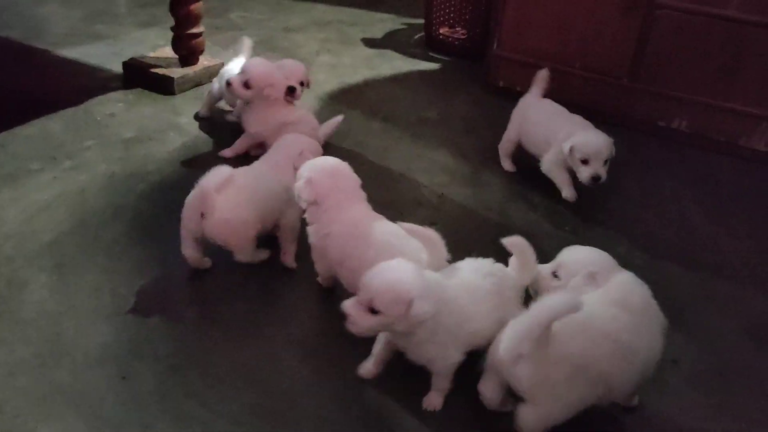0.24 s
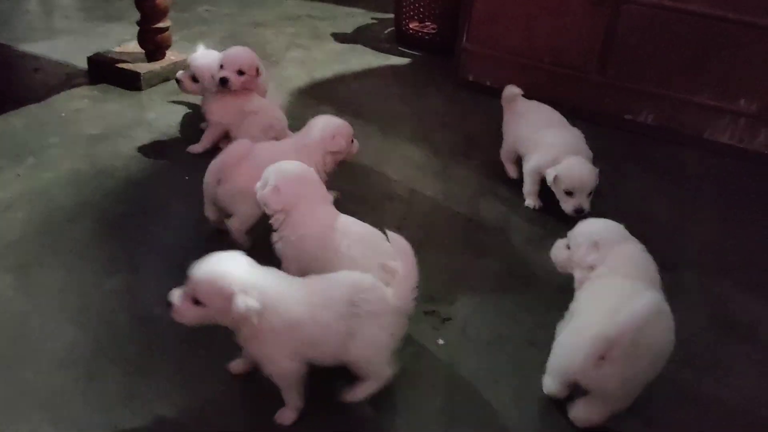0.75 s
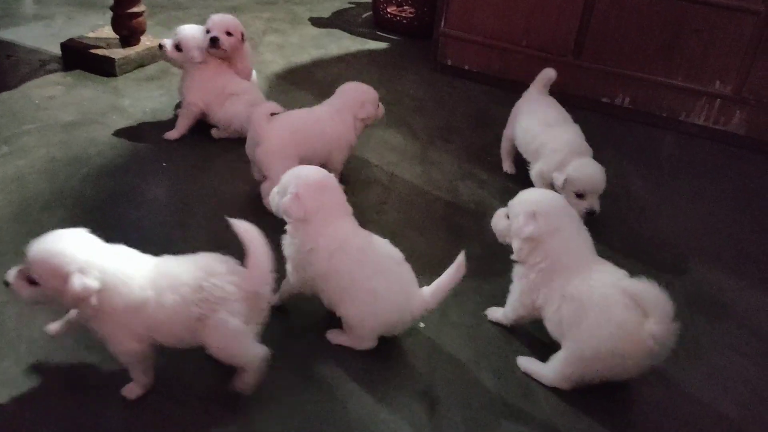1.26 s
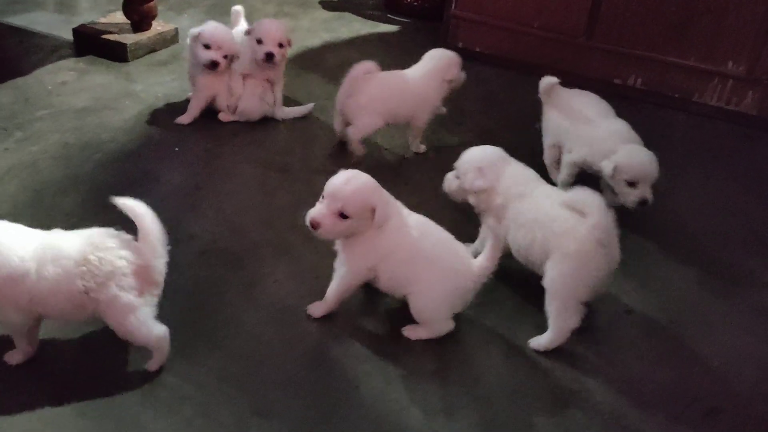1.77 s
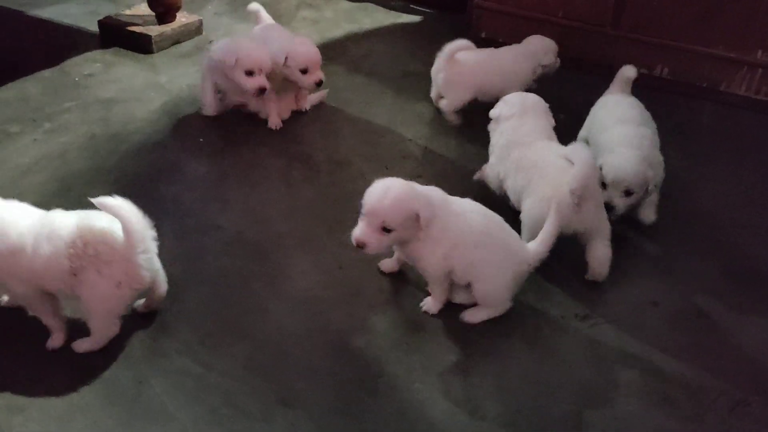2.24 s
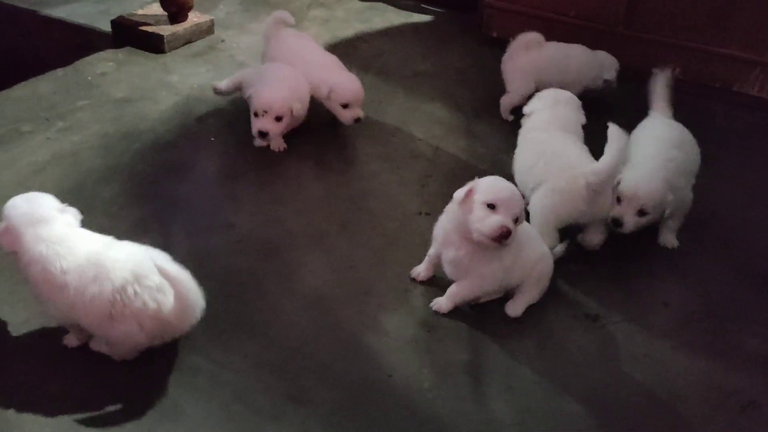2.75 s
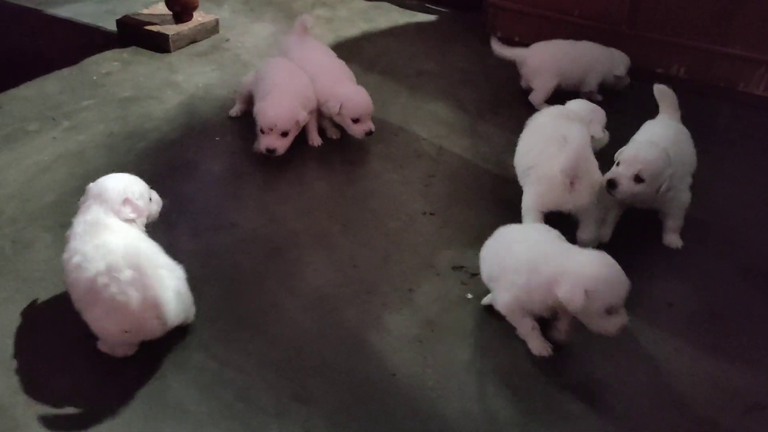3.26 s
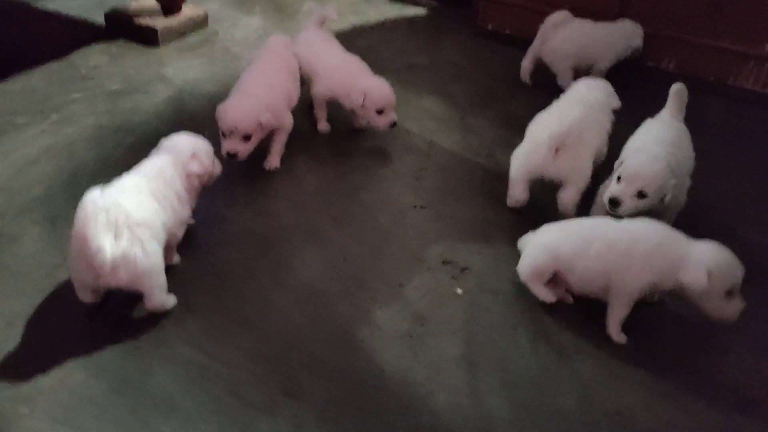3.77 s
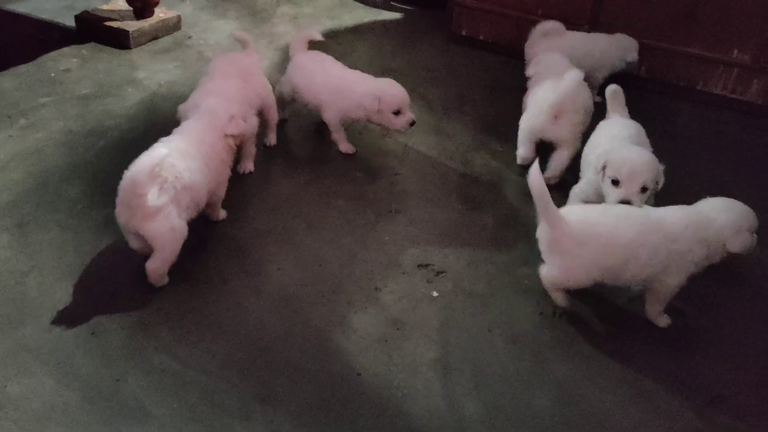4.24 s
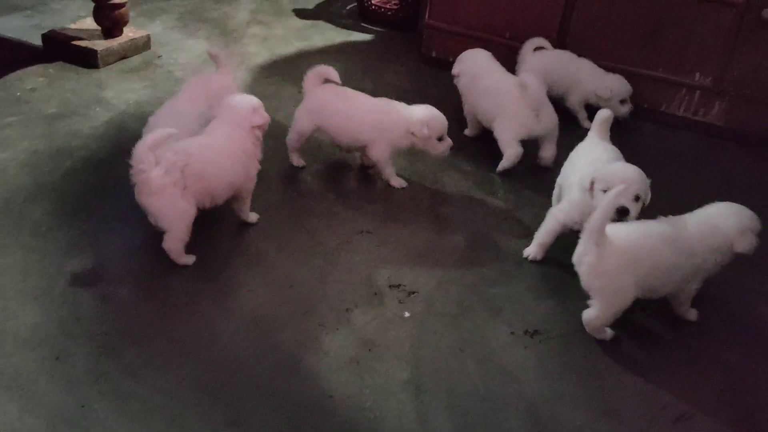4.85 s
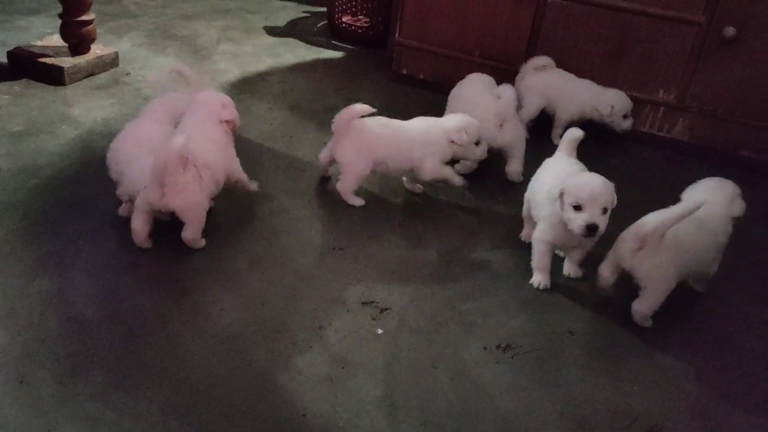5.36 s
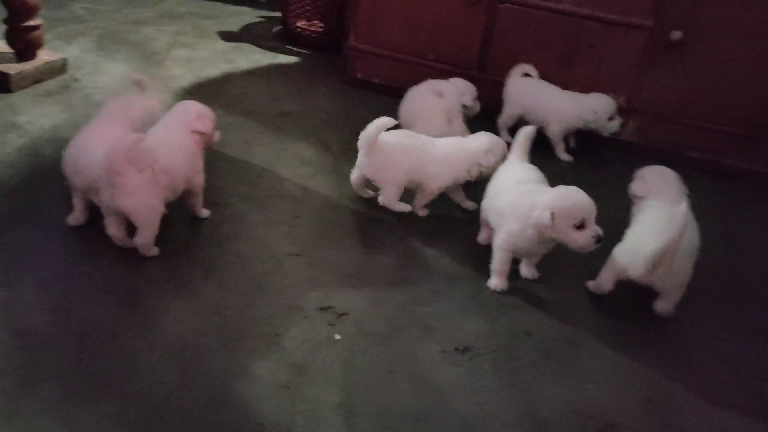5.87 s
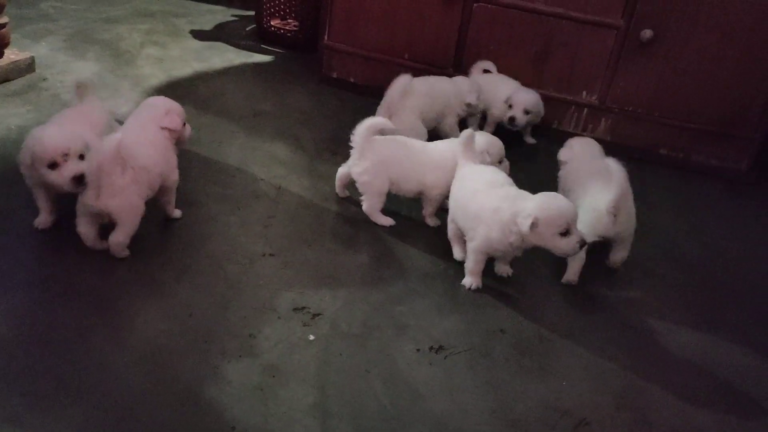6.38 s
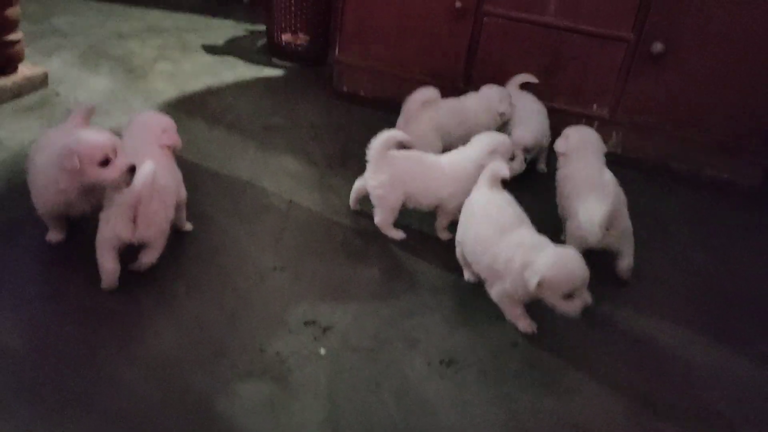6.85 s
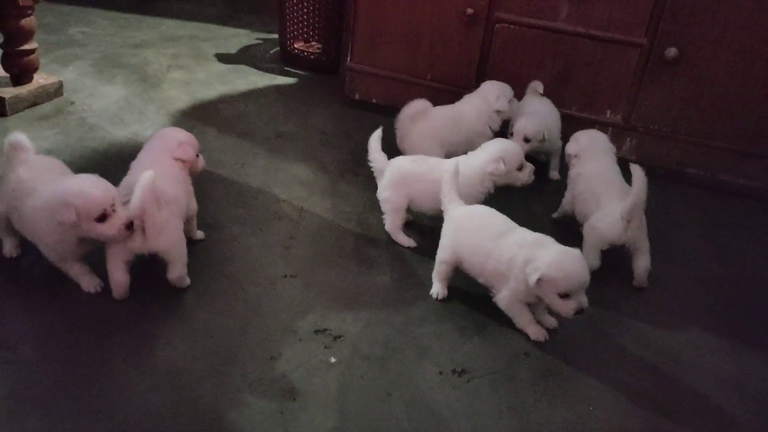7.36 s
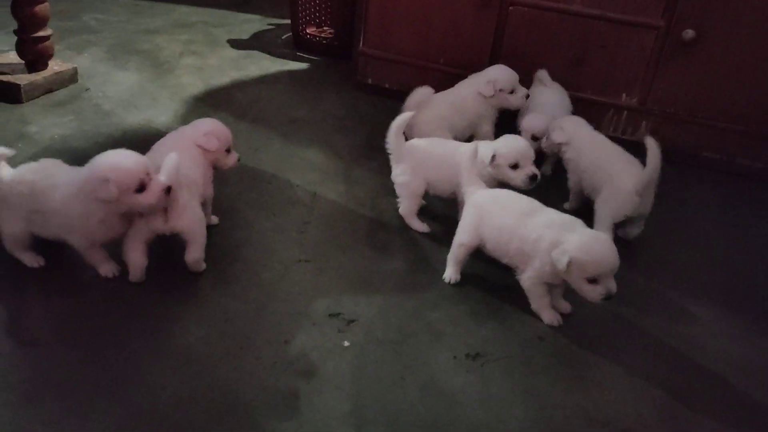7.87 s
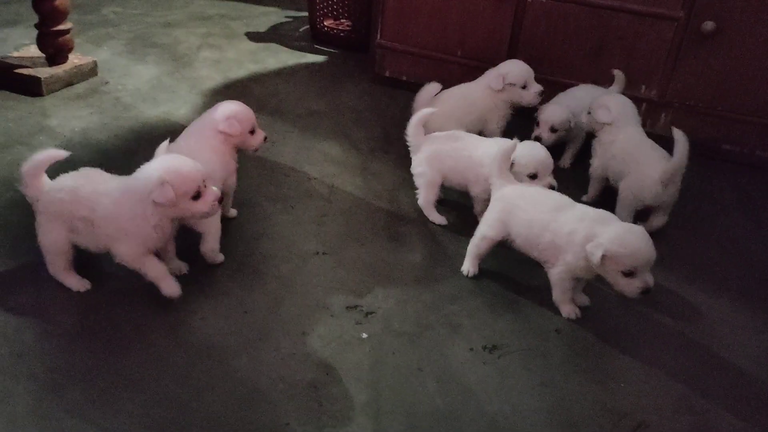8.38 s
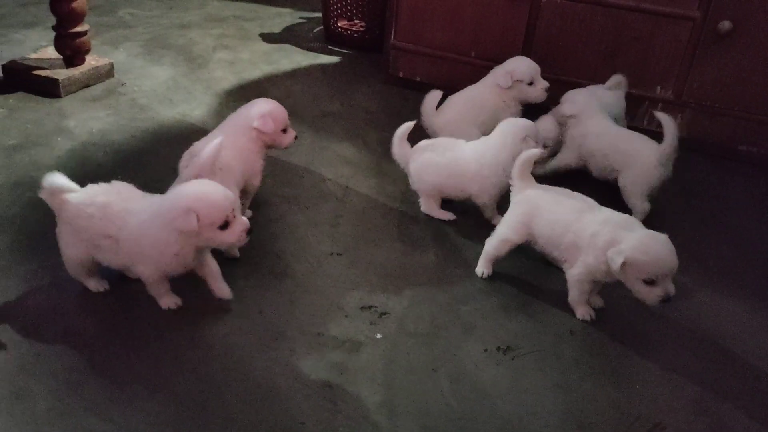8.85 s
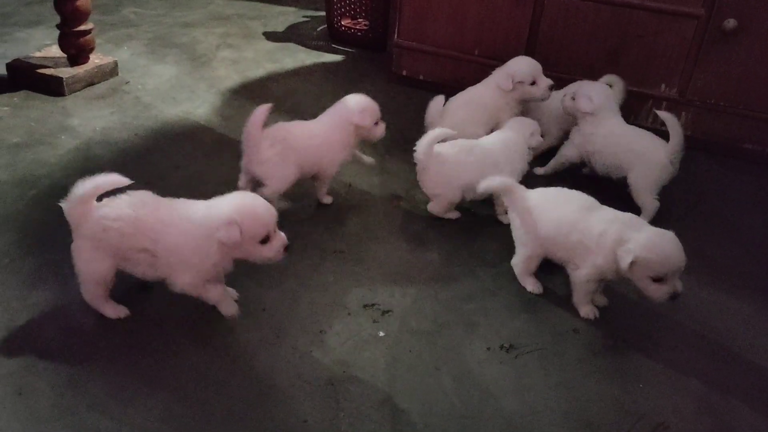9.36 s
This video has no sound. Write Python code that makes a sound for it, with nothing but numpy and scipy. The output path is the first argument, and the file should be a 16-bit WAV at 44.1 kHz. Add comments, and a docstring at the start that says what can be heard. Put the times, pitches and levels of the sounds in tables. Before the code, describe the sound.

A litter of young puppies gives short high yips and soft little grunts in a small room with a concrete floor. Thin, wavering whimpers follow, with faint scuffs and bumps of paws. About six seconds in come three sharp yelps, the loudest sounds, then more grunts and a few shrill squeals near the end. The microphone is close, with a brief echo and a faint low rumble underneath.

```python
"""Puppies in a small hard room

A litter yips, grunts, yelps and whimpers, scuffing, brushing and bumping about on a concrete floor.
Each call is a source and a filter: harmonics of the vocal folds and breath noise pass through the
mouth, dull when it is shut and bright when it is open. Two close microphones pick up the calls
and their echoes over a low room rumble with some mains hum."""
import sys
import numpy as np
from scipy import signal
from scipy.fft import rfft, irfft
from scipy.io import wavfile
from scipy.ndimage import uniform_filter1d

SR = 44100
rng = np.random.default_rng(int(sys.argv[2]) if len(sys.argv) > 2 else 0)


def dump(signal):
    """Clip the signal to [-1, 1] and save it as 16-bit WAV at the path in sys.argv[1]."""
    limited = np.clip(np.atleast_2d(signal).T, -1, 1)
    pcm = np.round(limited * 32767).astype(np.int16)
    wavfile.write(sys.argv[1], SR, pcm)


N = 424241

CLEAR, HUSKY, RASPY, GRAVELLY, HOARSE = .09, .17, .23, .36, .6  # roughness of a voice, 0-1


def voice(hz, effort, open_db, rough, fundamental_db=0):
    """Source-filter model: the vocal folds give harmonics and puffs of breath; the mouth colours both."""
    size, tuned_hz = len(hz), 987
    onset = np.exp(-np.arange(size) / (.007 * SR))
    shut_db = -8 * onset  # a call starts muffled and rough
    rough = np.minimum(rough + .3 * onset, 1)
    octaves_above = np.log2(np.maximum(hz / tuned_hz, 1))
    jitter = .06 * rough * drift(size, size=100)
    cycles = np.cumsum(hz * (1 + jitter)) / SR
    harmonic = np.arange(1, 15000 // hz.min())[:, None]
    share = effort / effort.max()
    opening_db = open_db + 6 * np.log10(share + .02) + shut_db  # widest at full effort
    blur_db = -rough * harmonic * hz / 430  # roughness weakens the high harmonics first
    shimmer_db = 11 * np.sqrt(rough) * drift((len(harmonic), size), size=500)
    partials = mouth(harmonic * hz, opening_db) * gain_of(blur_db + shimmer_db)
    partials[0] *= gain_of(fundamental_db + 7 * octaves_above)  # the throat lifts a high fundamental
    throb_db = 45 * np.minimum(rough, GRAVELLY) ** 2 * np.tanh(drift(size, size=130))
    phase = 2 * np.pi * (harmonic * cycles + rng.random(harmonic.shape))
    folds = (partials * gain_of(throb_db) * np.cos(phase)).sum(0)
    puffs = (1 - cycles % 1) * rng.standard_normal(size) * np.sqrt(share)  # one each time the folds open
    bin_hz = np.fft.rfftfreq(size, 1 / SR)
    above_pitch = 1 / (1 + (hz.mean() / (bin_hz + 1)) ** 6)
    breath = irfft(rfft(puffs) * mouth(bin_hz, open_db) * above_pitch, size) * gain_of(shut_db)
    breathiness = rough * gain_of(-7 * octaves_above)
    return effort * unit_rms((1 - rough) * unit_rms(folds) + breathiness * unit_rms(breath))


def mouth(hz, open_db):
    """Formant filtering: the vocal tract favours its resonances and loses treble as the mouth shuts."""
    # response at open_db = 12: frequency_hz, gain_db
    formants = [(180, -56), (300, -2.5), (756, -11.5), (953, -8), (1560, -15), (1730, -7.5), (2280, -6),
                (3230, -7), (3750, -18), (4250, -17), (4800, -12.5), (6150, -9), (7020, -13.5),
                (8900, -10.5), (10500, -26), (13000, -36.5), (15500, -52.5)]
    # muffling by a shutting mouth: frequency_hz, share_of_treble_loss
    muffle = [(320, 0.012), (620, 0.061), (2200, 0.59), (2900, 1.2), (4000, 1.135)]
    return gain_of(curve_at(formants, hz) + (open_db - 12) * curve_at(muffle, hz))


def yelp(rise_s, fall_s, top_hz, end_hz, start_db, top_db, end_db, open_db, fundamental_db, rough,
         rise_bend, swell_bend):
    """Frequency and amplitude modulation: pitch and effort climb to one top, then drop and roughen."""
    climb_hz = 742.4
    t = np.arange(-rise_s, fall_s, 1 / SR)
    before, after = np.maximum(-t / rise_s, 0), np.maximum(t / fall_s, 0)
    dropped = np.sin(np.pi / 2 * after ** .9) ** 2
    hz = top_hz - climb_hz * before ** rise_bend - (top_hz - end_hz) * dropped
    hz = uniform_filter1d(hz, size=300, mode="nearest")
    level_db = top_db + (start_db - top_db) * before ** swell_bend + (end_db - top_db) * after ** 1.17
    effort = gain_of(level_db) * signal.windows.tukey(len(t), .05)
    return voice(hz, effort, open_db, rough + .25 * after, fundamental_db)


def yelps():
    """Loud phonation: yelps, and shrill squeals whose pitch shoots up before their level does."""
    # yelps: start_s, rise_s, fall_s, top_hz, end_hz, start_db, top_db, end_db, open_db,
    # fundamental_db, roughness
    cries = [(5.832, 0.062, 0.08, 1506, 532, -36, -24.5, -39.5, 16, -2.5, CLEAR),
             (6.135, 0.077, 0.082, 1647, 640, -36.5, -23.5, -40, 16, 1.5, CLEAR),
             (6.342, 0.079, 0.097, 1567, 551, -33, -22.5, -46.5, 13.5, 2.5, CLEAR)]
    # squeals: the same columns
    squeals = [(8.681, 0.053, 0.02175, 2092, 1660, -50, -34.5, -38, 4, 0.85, HUSKY),
               (8.898, 0.06, 0.045, 2207, 1733, -41, -28.5, -35, 16.7, 1.3, RASPY)]
    return (track(yelp, cries, rise_bend=2.1, swell_bend=2.7)
            + track(yelp, squeals, rise_bend=3, swell_bend=1.2))


def short_call(length_s, pitch_hz, glide_octaves, level_db, open_db, rough, arch):
    """A burst of phonation: quick attack, rounded body and soft end on a gliding, arched pitch."""
    attack_s, scoop_s = .007, .0067
    t = np.arange(0, 1.2 * length_s, 1 / SR)
    progress = np.minimum(t / length_s, 1)
    centred = progress - .5
    hz = pitch_hz * 2 ** (glide_octaves * centred) * (1 - arch * (2 * centred) ** 2)
    hz *= 1 - .12 * np.exp(-t / scoop_s)  # starts flat and slides up
    effort = np.minimum(t / attack_s, 1) * (1.1 + np.sin(np.pi * progress) ** 2)
    release = np.clip((1.2 - t / length_s) / .25, 0, 1)
    return voice(hz, gain_of(level_db) * effort * release, open_db, rough)


def yips():
    """Pitch coupled to effort: short high calls, of which the loudest arch the most; two gravelly rows near 8.7
    and 9.0 s give the squeals their hoarse ends."""
    # yips: start_s, length_s, pitch_hz, glide_octaves, level_db, open_db, roughness; the rows at 8.727 and
    # 8.974 s are the hoarse tails of the two squeals
    calls = [(0.314, 0.059, 660, -0.33, -46.5, 15.5, HUSKY),
             (0.411, 0.066, 480.6, 0.094, -61.5, -4.5, HUSKY),
             (0.55, 0.088, 671.3, -0.21, -46.5, 14, HUSKY),
             (1.048, 0.085, 770.2, -0.32, -41.5, 12.5, HUSKY),
             (1.298, 0.072, 746.4, -0.13, -42.5, 15, HUSKY), (2.481, 0.037, 611, -0.5, -59, -9, RASPY),
             (3.568, 0.038, 813, -0.32, -62.5, -46.5, RASPY), (3.804, 0.034, 690, -0.38, -63, -41, RASPY),
             (4.508, 0.07, 614, 0.28, -60.5, -28.5, HUSKY), (5.582, 0.032, 487, .45, -51, -19, CLEAR),
             (5.602, 0.065, 514.8, -0.16, -45.5, 10, HOARSE),
             (6.271, 0.084, 453.3, -0.25, -45, 11, GRAVELLY), (6.957, 0.052, 798, -0.2, -64.5, -22, CLEAR),
             (8.458, 0.069, 1197, -0.34, -54.5, -13.5, GRAVELLY),
             (8.727, 0.0433, 2030, -0.08, -44, 4, GRAVELLY),
             (8.974, 0.05, 2063, -0.08, -37.5, -1.5, GRAVELLY),
             (9.156, 0.06, 995, -0.82, -58.5, 4, GRAVELLY)]
    out = np.zeros(N)
    for start_s, length_s, pitch_hz, glide_octaves, level_db, open_db, rough in calls:
        arch = .015 * max(level_db + 49, 0)
        add(out, start_s, short_call(length_s, pitch_hz, glide_octaves, level_db, open_db, rough, arch))
    return out


def grunts():
    """Slow vibration of the folds: short low calls whose pitch humps and sags a little."""
    # grunts: start_s, length_s, pitch_hz, level_db, open_db, roughness
    calls = [(0.053, 0.074, 332, -61.5, -15.5, CLEAR), (0.83, 0.065, 353, -58, -1.5, CLEAR),
             (1.57, 0.035, 319.3, -66, 11, RASPY), (1.742, 0.063, 389.6, -56.5, 0.5, HUSKY),
             (1.956, 0.069, 192.4, -52, 7, RASPY), (2.182, 0.079, 184.8, -57.5, 4, RASPY),
             (2.401, 0.042, 346.6, -59, -2, HUSKY), (2.783, 0.025, 304.7, -67.5, 5, RASPY),
             (2.949, 0.037, 329.7, -57, -1, RASPY), (3.141, 0.032, 307, -57.5, -5, RASPY),
             (3.331, 0.096, 313.8, -54, -5.5, HUSKY), (3.636, 0.038, 291, -59.5, -31, HUSKY),
             (4.039, 0.019, 311.5, -56, -21, HUSKY), (5.412, 0.046, 302.8, -62, -36, HUSKY),
             (6.781, 0.042, 315, -60.5, -8, CLEAR), (6.978, 0.024, 333, -60, -12, CLEAR),
             (7.165, 0.035, 374.6, -65.5, -12, HUSKY), (8.11, 0.059, 398.2, -57, 1.5, HUSKY),
             (8.3, 0.075, 365, -58, -4.5, HUSKY)]
    glide_octaves, arch = -.13, .06
    out = np.zeros(N)
    for start_s, length_s, pitch_hz, level_db, open_db, rough in calls:
        add(out, start_s, short_call(length_s, pitch_hz, glide_octaves, level_db, open_db, rough, arch))
    return out


def whimpers():
    """Nasal radiation: the nose passes the lowest harmonics; some of the highest leak past the lips."""
    # wavering pitch, one curve a whimper: time_s, pitch_hz
    contours = [
        [(2.466, 1460), (2.49, 1310), (2.525, 1272)],
        [(2.667, 1292), (2.683, 994), (2.71, 769), (2.745, 1041), (2.79, 1132)],
        [(2.91, 1420), (2.93, 1196), (2.97, 1605), (3.03, 1345), (3.1, 931.5), (3.135, 945), (3.165, 1240)],
        [(3.312, 712), (3.335, 638), (3.37, 626), (3.405, 770)],
        [(4.009, 641), (4.03, 612), (4.052, 738)],
    ]
    # strength of each whimper: start_db, end_db, lip_leak_db
    levels = [(-51, -48.5, -13), (-50.5, -59, -12.5), (-45, -43, -12.5), (-52, -46, -20), (-47, -58, -45)]
    nose_hz, lips_hz = 2350, 5500
    out = np.zeros(N)
    for contour, (start_db, end_db, leak_db) in zip(contours, levels):
        time_s, pitch_hz = np.transpose(contour)
        t = np.arange(time_s[0], time_s[-1], 1 / SR)
        hz = uniform_filter1d(np.interp(t, time_s, pitch_hz), size=600, mode="nearest")
        effort = gain_of(np.linspace(start_db, end_db, len(t))) * signal.windows.tukey(len(t), .15)
        note = voice(hz, effort, open_db=6, rough=CLEAR)
        nose = filtered(note, nose_hz, "low", order=6)
        lips = filtered(note, lips_hz, "high", order=6)
        add(out, time_s[0], nose + gain_of(leak_db) * lips)
    return out


def scuffs():
    """Impact and friction: claws and paws tick on the concrete and scrape briefly."""
    # scuffs: start_s, level_db, upper_edge_hz
    scrapes = [(2.427, -55, 9600), (2.621, -57.5, 8650), (2.796, -60, 9100), (4.186, -65, 2450),
               (7.167, -58.5, 5620), (7.719, -64, 9000)]
    t = np.arange(3000) / SR
    envelope = np.exp(-t / .011) + .65 * np.exp(-t / .045)
    out = np.zeros(N)
    for start_s, level_db, edge_hz in scrapes:
        grit = rng.standard_normal(len(t)) * envelope
        add(out, start_s, gain_of(level_db) * filtered(grit, [edge_hz / 1.62, edge_hz], "band"))
    return out


def rustles():
    """Friction noise: fur and paws brush past with a grainy hiss that swells and fades."""
    # brushes: start_s, length_s, level_db, low_hz, high_hz
    brushes = [(2.482, 0.11, -57.5, 4140, 15200), (5.337, 0.18, -72.5, 1006, 3600),
               (8.425, 0.14, -68, 8370, 15000)]
    out = np.zeros(N)
    for start_s, length_s, level_db, low_hz, high_hz in brushes:
        size = round(length_s * SR)
        grit = rng.standard_normal(size) * gain_of(level_db + 5.9 * drift(size, size=150))
        add(out, start_s, filtered(grit * np.hanning(size), [low_hz, high_hz], "band"))
    return out


def thumps():
    """Heavily damped oscillation: soft bodies and paws strike the floor and ring for a few cycles."""
    # bumps and taps: start_s, level_db, pitch_hz
    bumps = [(2.448, -56.5, 95), (3.805, -58.5, 93.9), (4.895, -56, 445), (5.065, -52, 440)]
    out = np.zeros(N)
    for start_s, level_db, pitch_hz in bumps:
        cycles = pitch_hz * np.arange(4000) / SR
        envelope = np.exp(-cycles / 1.5) * np.minimum(cycles / .09, 1)
        add(out, start_s, gain_of(level_db) * envelope * np.sin(2 * np.pi * cycles))
    return out


def room(source, right_lag_samples, wet_db):
    """Reverberation: direct sound reaches each microphone in turn, then sparse echoes decay by band."""
    # reverberation time: frequency_hz, t60_s
    decay = [(400, 0.24), (1200, 0.29), (8000, 0.23)]
    # balance of the microphones: frequency_hz, left_over_right_db
    balance = [(300, 2.5), (1300, -2.5), (4400, 8), (9000, 2.5)]
    size = SR // 2
    slots = np.arange(130, size - 20, 20)
    arrivals = slots + rng.integers(0, 20, (2, len(slots)))
    echoes = np.zeros((2, size))
    np.put_along_axis(echoes, arrivals, rng.choice([-1., 1.], arrivals.shape), 1)
    hz, t, spectra = signal.stft(echoes, SR, nperseg=256)
    coherence = 1 / (1 + (hz[:, None] / 700) ** 4)  # both microphones share the bass echoes
    spectra[1] = coherence * spectra[0] + np.sqrt(1 - coherence ** 2) * spectra[1]
    spectra *= gain_of(-60 * t / curve_at(decay, hz)[:, None])
    tail = signal.istft(spectra, SR, nperseg=256)[1][:, :size]
    bin_hz = np.fft.rfftfreq(size, 1 / SR)
    side = np.array([[1], [-1]])
    direct = np.exp(1j * np.pi * bin_hz * side * right_lag_samples / SR)
    path = direct + gain_of(wet_db) * rfft(tail / np.linalg.norm(tail[0]))
    path *= gain_of(side * curve_at(balance, bin_hz) / 2)
    response = np.roll(irfft(path, size), 512, 1)
    return signal.fftconvolve(source[None], response, axes=1)[:, 512:N + 512]


def rumble_and_hum():
    """Partly coherent low noise swells and drifts, while two mains harmonics come and go."""
    # shape of the rumble spectrum: frequency_hz, relative_db
    colour = [(25, -30.5), (85, -8.5), (200, -18), (295, -16), (350, 2.5), (400, -12), (480, -30.5),
              (750, -41.5), (15500, -51)]
    # likeness of left and right: frequency_hz, coherence
    likeness = [(40, 0.026), (300, 0.64), (2000, 0.057)]
    # background levels: time_s, deep_rumble_db, hum_100_hz_db, hum_200_hz_db
    swells = [(0, -0.5, -73, -74.5), (1.451, 7.5, -75, -74.5), (1.55, -2, -111, -100.5),
              (3.499, -1.5, -83, -118), (4.602, -7, -91, -99.5), (6.001, 6.5, -79, -70.5),
              (6.699, 0.5, -108, -97.5)]
    time_s, deep_db, low_db, high_db = np.transpose(swells)
    rumble_db = -69
    frames, hz = N // 512 + 5, np.fft.rfftfreq(2048, 1 / SR)
    left_re, left_im, apart_re, apart_im, patches = rng.standard_normal((frames, 1025, 5)).T
    patches_db = 2 * unit_rms(uniform_filter1d(uniform_filter1d(patches, 6, 0), 12, 1))
    coherence = curve_at(likeness, hz)[:, None]
    left = left_re + 1j * left_im
    right = coherence * left + np.sqrt(1 - coherence ** 2) * (apart_re + 1j * apart_im)
    swell_db = (hz < 180)[:, None] * np.interp(np.arange(frames) * 512 / SR, time_s, deep_db)
    spectra = np.array([left, right]) * gain_of(curve_at(colour, hz)[:, None] + patches_db + swell_db)
    noise = unit_rms(signal.istft(spectra, nperseg=2048, noverlap=1536)[1][:, :N])
    t = np.arange(N) / SR
    hum = sum(gain_of(np.interp(t, time_s, level_db)) * np.sin(2 * np.pi * hum_hz * t)
              for hum_hz, level_db in ((100, low_db), (200, high_db)))
    return gain_of(rumble_db) * noise + hum


def gain_of(db):
    """Decibels to amplitude ratio."""
    return 10 ** (np.asarray(db) / 20)


def unit_rms(x):
    """Normalisation to rms 1."""
    return x / np.sqrt(np.mean(x ** 2) + 1e-20)


def drift(shape, size):
    """Low-pass noise of rms 1 that wanders over size samples."""
    return unit_rms(uniform_filter1d(uniform_filter1d(rng.standard_normal(shape), size), size))


def curve_at(points, hz):
    """Interpolation on a log-frequency axis."""
    point_hz, value = np.transpose(points)
    return np.interp(np.log(hz + 1), np.log(point_hz + 1), value)


def filtered(x, hz, kind, order=2):
    """Filtering with a maximally flat passband."""
    return signal.sosfilt(signal.butter(order, hz, kind, fs=SR, output="sos"), x)


def add(mix, start_s, sound):
    """Superposition of a sound on the mix."""
    part = mix[round(start_s * SR):][:len(sound)]
    part += sound[:len(part)]


def track(source, rows, **settings):
    """Superposition of one sound a row, each at its start time."""
    out = np.zeros(N)
    for start_s, *row in rows:
        add(out, start_s, source(*row, **settings))
    return out


def scene():
    """Time differences between the microphones set the puppies in four places, over the rumble."""
    yipping, grunting, yelping, whimpering = yips(), grunts(), yelps(), whimpers()
    movement = scuffs() + rustles() + thumps()
    return (room(yipping, right_lag_samples=-2.5, wet_db=-2)
            + room(grunting + movement, right_lag_samples=4.8, wet_db=-1)
            + room(yelping, right_lag_samples=10.1, wet_db=-2.5)
            + room(whimpering, right_lag_samples=7.9, wet_db=-6)
            + rumble_and_hum())


def record(dry):
    """Frequency response: the microphones lose a band of treble and the recorder limits the bandwidth."""
    dip_hz, width_hz, depth, edge_hz = 3800, 1400, .53, 15720
    band = signal.lfilter(*signal.iirpeak(dip_hz, dip_hz / width_hz, fs=SR), dry)
    low_pass = signal.firwin(511, edge_hz, window=("kaiser", 9), fs=SR)
    return signal.oaconvolve(dry - depth * band, low_pass[None], "same")


dry = scene()
out = record(dry)
dump(out)
```